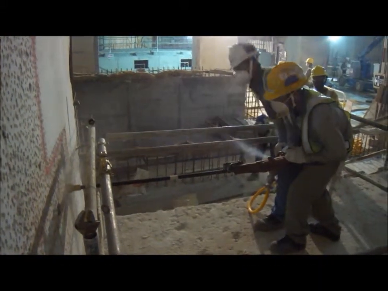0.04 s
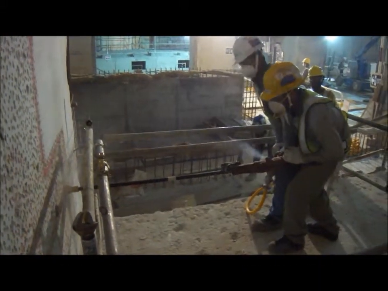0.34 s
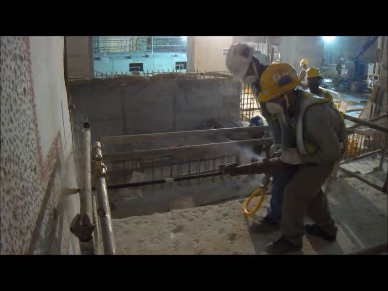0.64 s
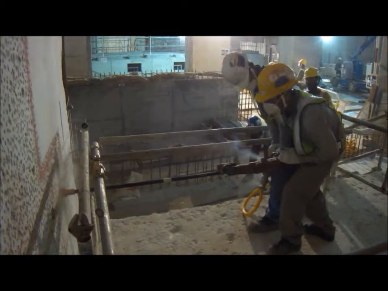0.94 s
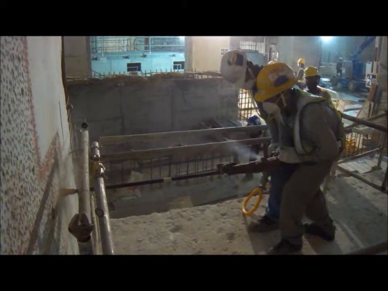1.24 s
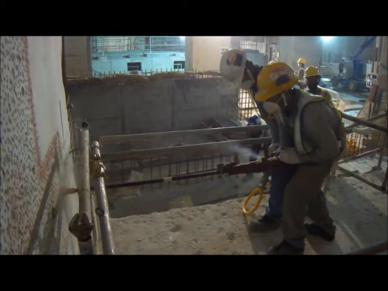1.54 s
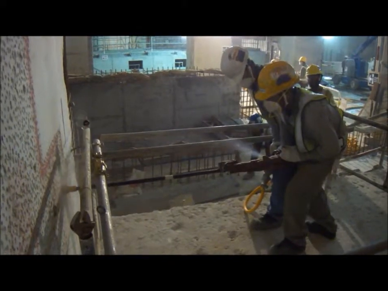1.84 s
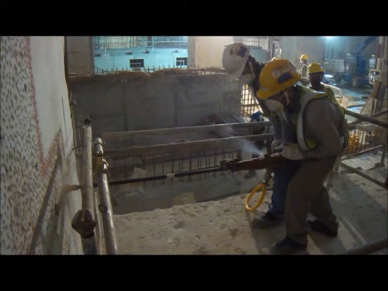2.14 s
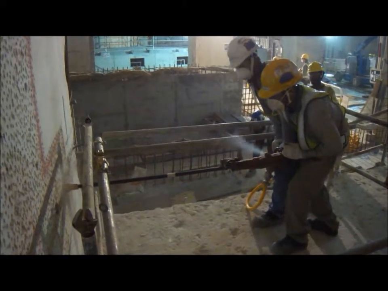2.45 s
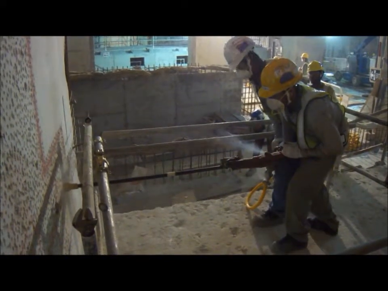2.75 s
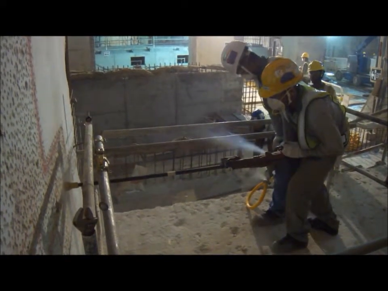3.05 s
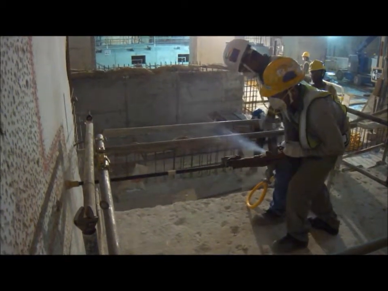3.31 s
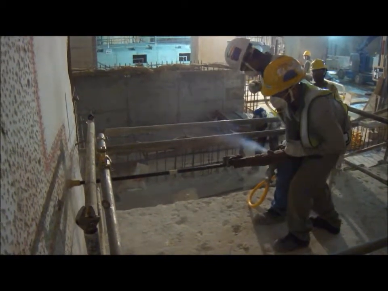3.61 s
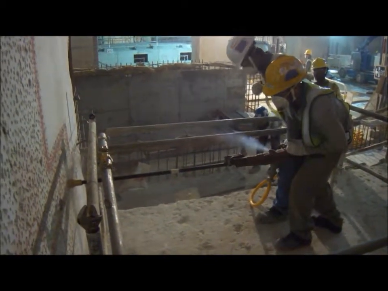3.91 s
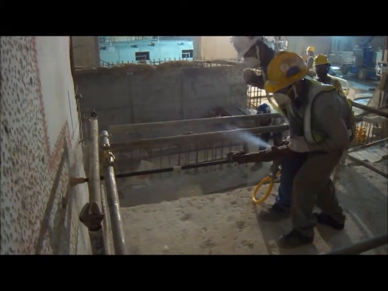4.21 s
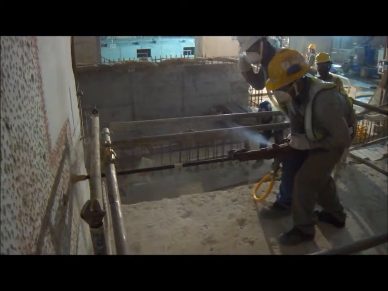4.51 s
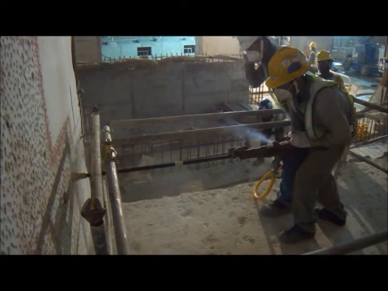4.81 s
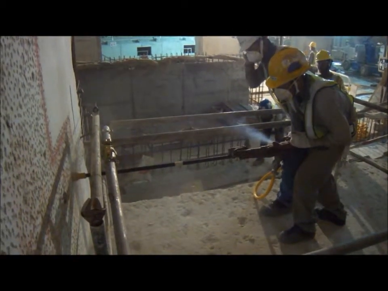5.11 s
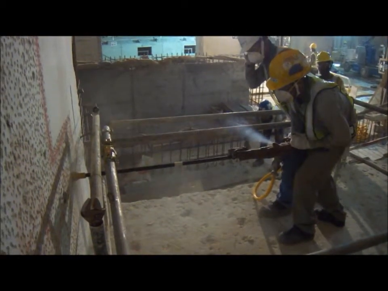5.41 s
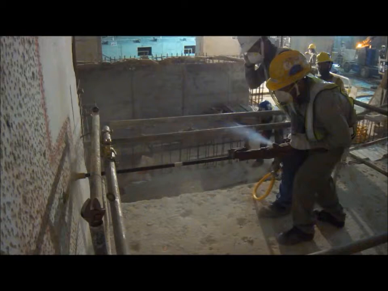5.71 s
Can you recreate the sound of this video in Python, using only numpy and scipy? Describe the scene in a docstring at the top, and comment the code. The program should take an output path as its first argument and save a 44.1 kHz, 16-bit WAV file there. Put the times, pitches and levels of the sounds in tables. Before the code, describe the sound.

A hand-held hydraulic rock drill hammers steadily into concrete, its steel rod rattling and ringing in an echoing hall.

```python
"""Inside a bare concrete building, a hand-held hydraulic rock drill hammers a long steel rod into a wall.
About thirty times a second the piston strikes, the rod chatters and rings, and the wall thuds.
Halfway through, the piston speeds up and the thuds get harder; now and then the rod comes free
and clangs. Pulsing oil makes the housing hum, flushing air hisses at the tool,
and echoes from the hall fill the gaps between the blows."""
import sys
import numpy as np
from scipy import signal
from scipy.fft import rfft, irfft
from scipy.io import wavfile
from scipy.ndimage import uniform_filter1d

SR = 44100
rng = np.random.default_rng(int(sys.argv[2]) if len(sys.argv) > 2 else 0)


def master_out(mix):
    """Clip the mix to full scale and print it as 16-bit PCM to the path in sys.argv[1]."""
    frames = np.transpose(np.atleast_2d(mix))
    ceiling = np.clip(frames, -1, 1)
    pcm = np.round(ceiling * 32767).astype(np.int16)
    wavfile.write(sys.argv[1], SR, pcm)


N = 262836
TIME = np.arange(N) / SR
USUAL_SPEED, USUAL_FORCE_DB = 31, -22  # blows per second; push on the bit

# how fast the piston hammers: t/s, speed/(blows per s)
PISTON_SPEED = [(0.0, 28.92), (0.38, 29.86), (0.76, 29.43), (1.52, 29.46), (2.03, 29.89), (2.28, 29.5),
                (2.41, 30.25), (2.79, 30.24), (2.92, 32.47), (3.68, 31.44), (4.44, 31.89), (4.57, 31.13),
                (5.45, 31.7), (5.96, 31.71)]
# how hard the bit is pressed into the wall: t/s, level/dB
PUSH_FORCE = [(0.0, -22.5), (0.37, -22.5), (0.4, -27.5), (0.5, -22), (0.64, -24), (0.94, -22), (1.01, -24),
              (1.15, -25.2), (1.18, -22), (2.19, -23.6), (2.43, -20.5), (2.49, -24.5), (2.63, -21.0),
              (2.95, -23.5), (3.01, -18), (3.14, -23.5), (3.26, -19.5), (3.45, -25), (3.7, -20.5),
              (3.89, -24), (3.92, -19.5), (4.52, -23), (4.78, -21), (4.84, -23.5), (5.07, -21), (5.96, -22)]
# how strongly the housing and hoses hum at each pitch: f/Hz, level/dB
HOUSING_HUM = [(90, -89), (118, -55.5), (127, -49.5), (150, -74), (185, -73), (207, -47), (222, -66),
               (235, -41.5), (245, -41), (254, -53.5), (268, -51), (287, -47), (298, -44.5), (318, -58)]

# tone colours, from low to high: f/Hz, level/dB
AIR_TONE = [(25, -26), (50, -22.5), (100, -10), (170, -2), (400, -4.5), (750, 6.5), (1500, 2.5), (3000, -1),
            (5000, -7), (8000, -4), (11000, -8)]  # air jet and site rumble
RETURN_TONE = [(100, -19), (300, -4), (800, 2), (1500, -2), (4000, -4), (5500, -15), (8000, -2),
               (11000, -10)]  # piston knocking in the housing
THUD_TONE = [(50, -39), (110, -18), (200, -6), (290, 1), (400, 0.5), (520, 1), (800, 0), (1100, -2.5),
             (2000, -6), (3500, -26)]  # struck concrete
CHATTER_TONE = [(300, -27), (700, -6.5), (1200, 1.5), (2300, 4.5), (3200, 5), (4200, 5), (5300, 3.5),
                (7500, -1), (9000, 1), (11000, -14.5)]  # rod rattling in the chuck, its holder

# notes at which the steel rings (a narrow one rings longer): f/Hz, width/Hz, level/dB
ROD_NOTES = [(697, 70, -7), (2770, 160, 0), (3520, 110, -4), (4372, 40, -10), (6580, 70, -6),
             (6825, 40, -12), (8430, 140, -7), (8650, 40, -10)]  # the long rod
CLANK_NOTES = [(1877, 90, 0)]  # its low clank
CLANG_NOTES = [(3850, 110, 0), (3910, 110, 0)]  # its clang, a close pair
CLINK_NOTES = [(4955, 160, -1), (5560, 160, -5), (5778, 120, -2)]  # its high clink
SHANK_NOTES = [(9428, 150, -5), (10030, 220, -7), (10260, 150, -3), (10500, 210, 0), (10681, 70, -6),
               (10900, 220, -10)]  # the shank, its short, stiff back end

# the two stages of one blow: delay/s, rise/s, decay/s, level/dB
STEEL_BLOW = [(0.0, 0.0006, 0.0032, -0.5), (.0027, 0.00096, 0.012, -0.5)]  # in the steel
WALL_BLOW = [(0.0, 0.00042, 0.0022, 0), (.0042, 0.00075, 0.0039, 0)]  # in the wall

# glancing blows that make the steel sing one note: t/s, f/Hz, level/dB
GLANCING_BLOWS = [(3.016, 4880, -18), (3.047, 5778, -22), (3.051, 4955, -18), (3.298, 1830, -25),
                  (3.329, 1850, -22), (3.329, 4975, -28), (4.056, 9440, -20), (4.120, 9440, -20),
                  (4.785, 9600, -16), (5.005, 1877, -22), (5.072, 5600, -18), (5.607, 1870, -22),
                  (5.735, 5778, -20), (5.891, 1855, -22)]
# blows that land solidly on the concrete: t/s, level/dB
SOLID_BLOWS = [(0.808, -28), (0.945, -32), (0.978, -36), (1.724, -31), (2.396, -33.5), (2.662, -26),
               (3.326, -28), (3.544, -30), (3.86, -30), (4.053, -24), (4.431, -29), (4.589, -30),
               (4.783, -35), (4.969, -43), (5.036, -32), (5.07, -31), (5.196, -24.5), (5.543, -27),
               (5.702, -30), (5.763, -30.5), (5.889, -34)]
# spells when the rod is free in its hole: t/s, length/s, level/dB (relative to the push)
FREE_SPELLS = [(0.13, 0.12, -5), (0.25, 0.135, -2), (0.46, 0.076, -7), (0.79, 0.17, -3.5),
               (1.507, 0.08, -7), (4.04, 0.03, -5)]


def from_db(db):
    """Turn decibels into a volume factor."""
    return 10 ** (np.asarray(db) / 20)


def rms_one(x):
    """Scale a sound so that its average strength (rms) is 1."""
    return x / np.sqrt(np.mean(x ** 2) + 1e-20)


def in_time(curve):
    """Join a table's points with straight lines, giving a value for every sample."""
    return np.interp(TIME, *np.transpose(curve))


def drift(per_s):
    """Wander to a new random value per_s times a second."""
    values = rng.standard_normal(512)
    return np.interp(TIME * per_s, np.arange(len(values)), values)


def coloured(x, tone):
    """Filter a sound to a tone colour, at strength 1."""
    hz, db = np.transpose(tone)
    grid_hz = np.maximum(np.fft.rfftfreq(8192, 1 / SR), 1)
    gains = from_db(np.interp(np.log(grid_hz), np.log(hz), db))
    # fold the filter so that nothing sounds ahead of a hit (minimum phase)
    cepstrum = irfft(np.log(gains))
    cepstrum[1:] *= 2
    cepstrum[len(cepstrum) // 2:] = 0
    response = irfft(np.exp(rfft(cepstrum)))
    return rms_one(signal.fftconvolve(x, response)[:N])


def ringing(hits, notes, vary_db):
    """Struck steel rings at its own notes; each blow feeds them a little differently."""
    out = 0
    for k, (hz, width, db) in enumerate(notes):
        fade = np.exp(-np.pi * width / SR)
        feedback = [1, -2 * fade * np.cos(2 * np.pi * hz / SR), fade * fade]
        note = rms_one(signal.lfilter([1, 0, -1], feedback, hits))
        out = out + (-1) ** k * from_db(db + vary_db * drift(per_s=30)) * note
    return rms_one(out)


def strokes(cycles, spread_db, jitter_s):
    """One click per piston cycle, slightly uneven in strength and timing."""
    at = np.flatnonzero(np.diff(np.floor(cycles)) > 0)
    strength, lateness = rng.standard_normal((len(at), 2)).T
    at = at + (lateness * jitter_s * SR).astype(int)
    clicks = np.zeros(N)
    clicks[np.clip(at, 0, N - 1)] = from_db(spread_db * strength)
    return clicks


def blow_shape(stages):
    """The force of one blow: each stage rises quickly and dies away."""
    force = 0
    for delay, rise, decay, db in stages:
        age = np.maximum(TIME[:SR // 20] - delay, 0)
        force = force + from_db(db) * (1 - np.exp(-age / rise)) * np.exp(-age / decay)
    return force


def contacts(blows, stages, repeat, grain_db):
    """Tiny impacts make up each blow; the share 'repeat' is alike every time, the rest is chance."""
    shape = blow_shape(stages)
    same = signal.fftconvolve(blows, shape * rng.standard_normal(len(shape)))[:N]
    grains = from_db(grain_db * rms_one(uniform_filter1d(rng.standard_normal(N), size=30)))
    fresh = signal.fftconvolve(blows, shape)[:N] * grains * rng.standard_normal(N)
    return np.sqrt(repeat) * rms_one(same) + np.sqrt(1 - repeat) * rms_one(fresh)


def flushing_air(speed):
    """An air jet hisses over the low rumble of the site, a little louder as the piston speeds up."""
    return from_db(-28 + 0.34 * (speed - USUAL_SPEED)) * coloured(rng.standard_normal(N), AIR_TONE)


def hall_echoes(x, fade_s, treble_hz):
    """Bare concrete throws back dense echoes; their pattern shifts as the tool and crew move."""
    age, out = TIME[:SR], 0
    walls = signal.butter(1, treble_hz, fs=SR, output="sos")
    running = np.r_[x[SR:2 * SR], x]  # the hall is already full of hammering at the start
    for position in np.eye(6):  # blend through six echo patterns in turn
        tail = rng.standard_normal(SR) * from_db(-60 * age / fade_s) * (age > .012)
        tail = signal.sosfilt(walls, tail / np.linalg.norm(tail))
        share = np.interp(TIME, np.linspace(0, TIME[-1], len(position)), position)
        out = out + np.sqrt(share) * signal.fftconvolve(running, tail)[SR:SR + N]
    return out


def oil_hum(cycles, speed, valve_lag, waver_db):
    """A valve switches in mid-cycle; the oil pulses shake the housing at multiples of the blow rate."""
    hz, db = np.transpose(HOUSING_HUM)
    out = 0
    for k in range(3, 11):
        level_db = np.interp(k * speed, hz, db) + waver_db * drift(per_s=7.3)
        out = out + np.sqrt(2) * from_db(level_db) * np.cos(2 * np.pi * k * (cycles - valve_lag))
    return out


def piston_return(cycles, rise_s, decay_s):
    """Thrown back, the piston knocks softly in the housing about half a cycle after it strikes."""
    stops = strokes(cycles - .49, spread_db=1.5, jitter_s=.0004)
    hits = contacts(stops, [(0, rise_s, decay_s, 0)], repeat=0.11, grain_db=0.5)
    return from_db(-37) * coloured(hits, RETURN_TONE)


def glancing_chinks(rise_s, decay_s):
    """A glancing blow leaves one short, clear note."""
    out, age = np.zeros(N), TIME[:SR // 10]
    shape = (1 - np.exp(-age / rise_s)) * np.exp(-age / decay_s)
    for start, hz, db in GLANCING_BLOWS:
        at = int(start * SR)
        ring = from_db(db) * shape * np.sin(2 * np.pi * hz * age)
        out[at:at + len(age)] += ring[:N - at]
    return out


def solid_knocks():
    """A solid blow thumps the wall harder than the rest, with a sharp crack."""
    blows = np.zeros(N)
    for start, db in SOLID_BLOWS:
        blows[int(start * SR)] = from_db(db)
    force = signal.fftconvolve(blows, blow_shape(STEEL_BLOW))[:N] * rng.standard_normal(N)
    thump = from_db(7) * coloured(force, THUD_TONE)
    crack = from_db(5) * coloured(force, CHATTER_TONE)
    return np.std(force) * (thump + crack)


def wall_thud(cycles, extra_speed, force_db):
    """The wall thuds just ahead of the chatter, harder with a faster piston or a firmer push."""
    blows = strokes(cycles + .025, spread_db=0.8, jitter_s=.00019)
    hits = contacts(blows, WALL_BLOW, repeat=0.19, grain_db=2.5)
    level_db = -35 + 1.2 * extra_speed + 0.9 * (force_db - USUAL_FORCE_DB)
    return from_db(level_db) * coloured(hits, THUD_TONE)


def shank_zing(blows, extra_speed):
    """The stiff shank rings very high; the bit turns, so some blows feed it more than others."""
    uneven = from_db(1.35 * np.clip(rng.standard_normal(N), -2, 2))
    hits = contacts(blows * uneven, STEEL_BLOW, repeat=0.054, grain_db=0)
    return from_db(-26.5 + 0.3 * extra_speed) * ringing(hits, SHANK_NOTES, vary_db=1.7)


def rod_clang(cycles, gripped_db, slip_s):
    """A hard clash just after each strike rings two close notes, loud only while the rod is free."""
    level = from_db(gripped_db)
    for start, length, db in FREE_SPELLS:
        end = start + length
        free = np.interp(TIME, [start - slip_s, start, end, end + slip_s], [0, 1, 1, 0])
        level = np.maximum(level, from_db(db) * free)
    clashes = strokes(cycles - .07, spread_db=1.2, jitter_s=.0004)
    return level * ringing(clashes, CLANG_NOTES, vary_db=1.5)


def rod_rattle(blows, extra_speed):
    """The struck rod chatters in its chuck and rings; its low clank grows with speed."""
    in_chuck = contacts(blows, STEEL_BLOW, repeat=0.044, grain_db=2.5)
    chatter = from_db(-3) * coloured(in_chuck, CHATTER_TONE)
    hits = contacts(blows, STEEL_BLOW, repeat=0.048, grain_db=2)
    ring = from_db(-8) * ringing(hits, ROD_NOTES, vary_db=2.5)
    clank = from_db(-16.5 + 2 * extra_speed) * ringing(hits, CLANK_NOTES, vary_db=1.5)
    clink = from_db(-10.5) * ringing(hits, CLINK_NOTES, vary_db=3.5)
    return chatter + ring + clank + clink


def hammering(cycles, speed):
    """The piston drives the rod into the wall; a firmer push makes the rod louder."""
    force_db = in_time(PUSH_FORCE)
    extra_speed = speed - USUAL_SPEED
    blows = strokes(cycles, spread_db=0.87, jitter_s=.0002)
    rattle = rod_rattle(blows, extra_speed)
    zing = shank_zing(blows, extra_speed)
    thud = wall_thud(cycles, extra_speed, force_db)
    clang = rod_clang(cycles, gripped_db=-17, slip_s=0.011)
    return from_db(force_db - 1) * (rattle + clang) + zing + thud + solid_knocks()


def scene():
    """The piston sets the beat for steel and oil alike; the hall echoes the impacts."""
    speed = in_time(PISTON_SPEED)
    cycles = .15 + np.cumsum(speed) / SR  # running count of piston cycles
    impacts = hammering(cycles, speed)
    impacts += piston_return(cycles, rise_s=0.00065, decay_s=0.0026)
    impacts += glancing_chinks(rise_s=0.0014, decay_s=0.014)
    echoes = from_db(-4.5) * hall_echoes(impacts, fade_s=0.9, treble_hz=8000)
    hum = oil_hum(cycles, speed, valve_lag=0.448, waver_db=2)
    return (impacts + echoes + hum + flushing_air(speed))[None]


def record(dry):
    """The microphone loses the highest treble and rounds off the loudest peaks."""
    cutoff_hz, peak_limit = 11040, .5
    treble_cut = signal.firwin(1001, cutoff_hz, window=("kaiser", 10), fs=SR)[None]
    heard = signal.fftconvolve(dry, treble_cut, "same")
    rounded = heard / (1 + (heard / peak_limit) ** 6) ** (1 / 6)
    return signal.fftconvolve(rounded, treble_cut, "same")


dry = scene()
out = record(dry)
master_out(out)
```